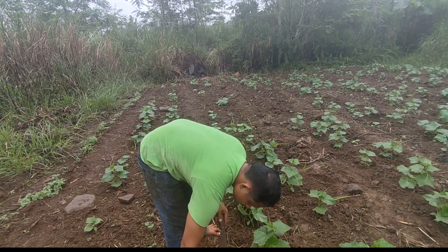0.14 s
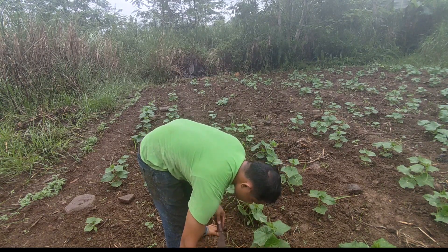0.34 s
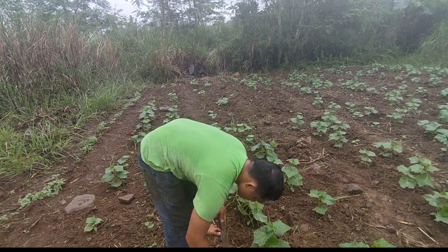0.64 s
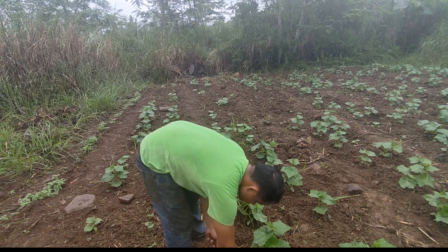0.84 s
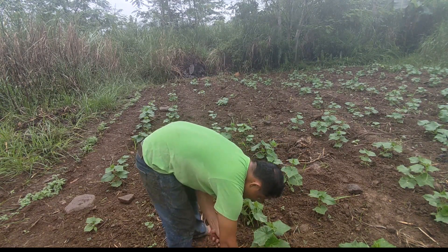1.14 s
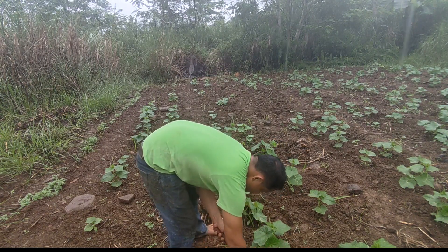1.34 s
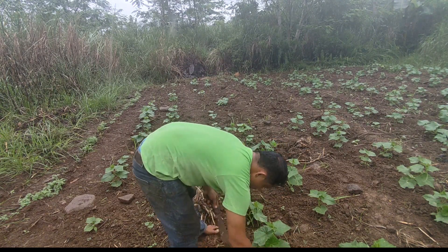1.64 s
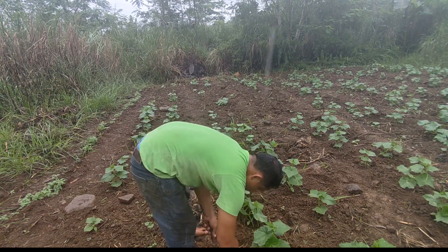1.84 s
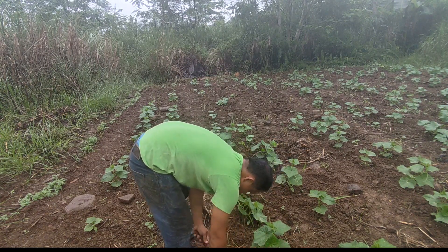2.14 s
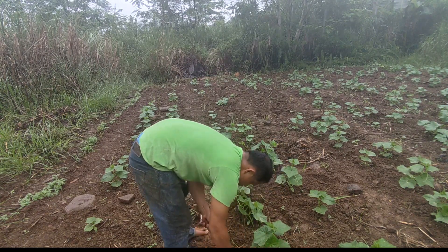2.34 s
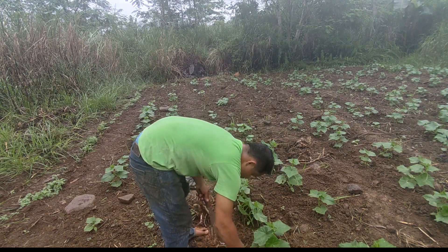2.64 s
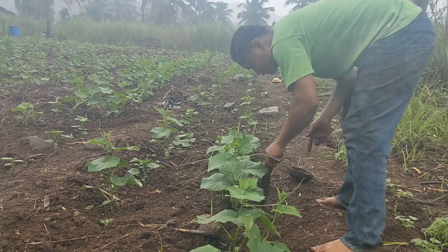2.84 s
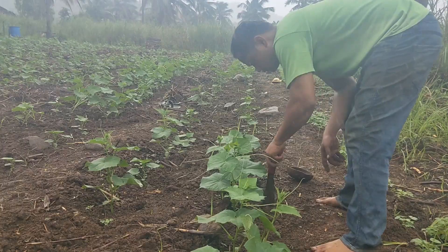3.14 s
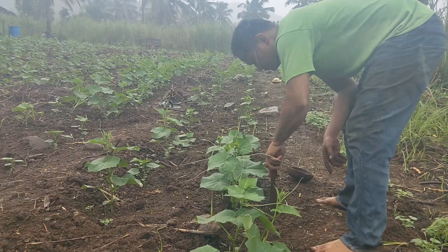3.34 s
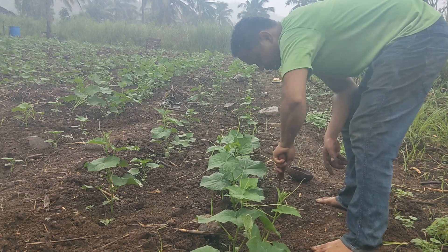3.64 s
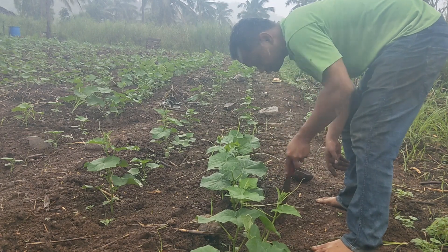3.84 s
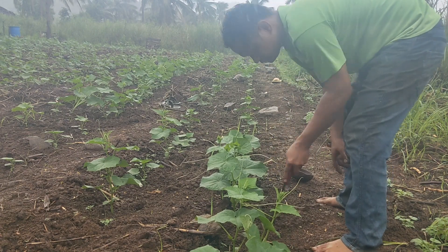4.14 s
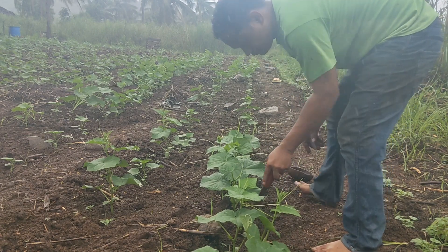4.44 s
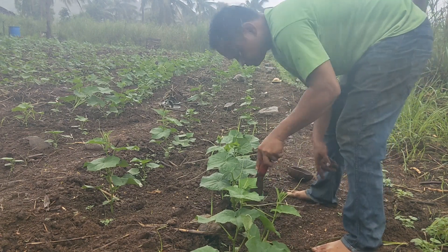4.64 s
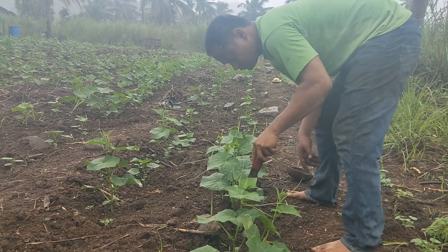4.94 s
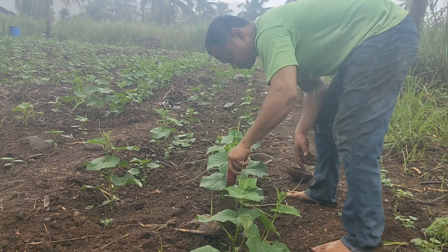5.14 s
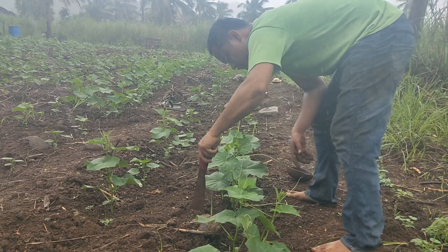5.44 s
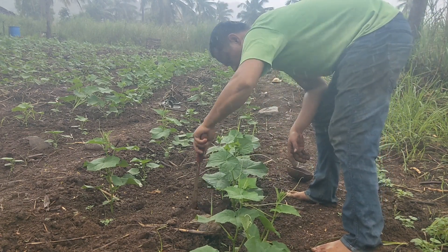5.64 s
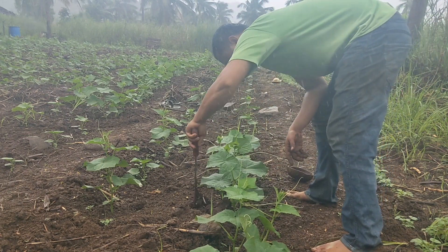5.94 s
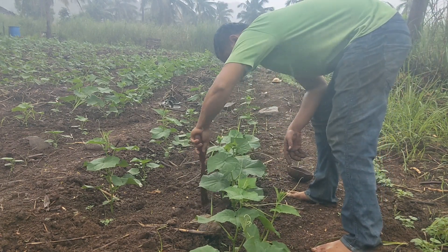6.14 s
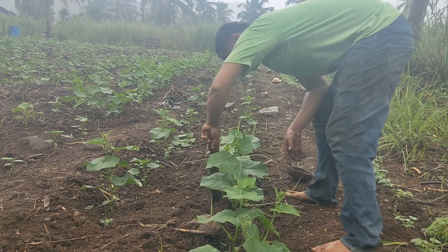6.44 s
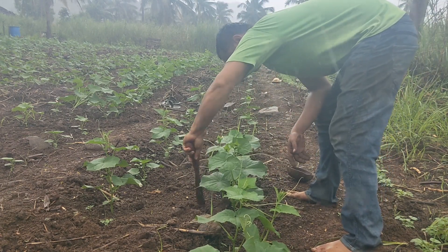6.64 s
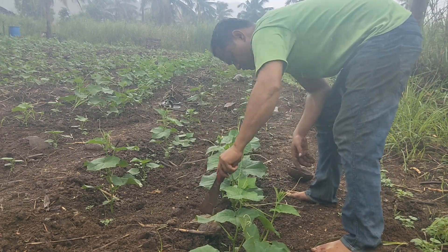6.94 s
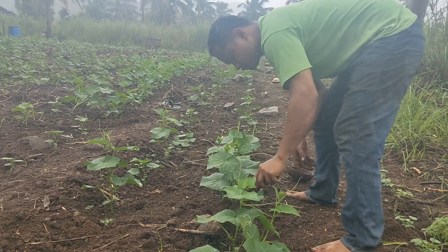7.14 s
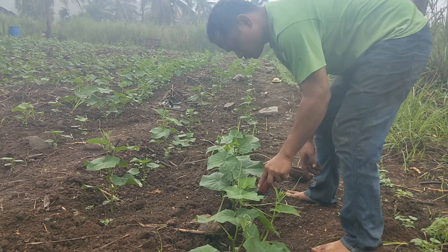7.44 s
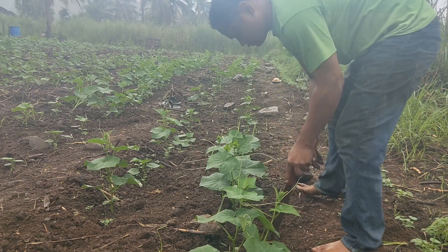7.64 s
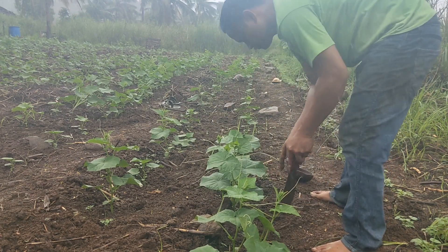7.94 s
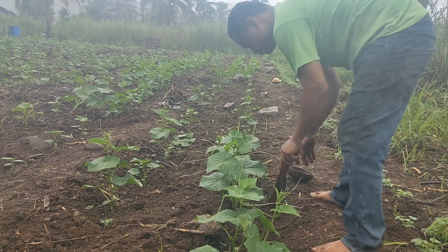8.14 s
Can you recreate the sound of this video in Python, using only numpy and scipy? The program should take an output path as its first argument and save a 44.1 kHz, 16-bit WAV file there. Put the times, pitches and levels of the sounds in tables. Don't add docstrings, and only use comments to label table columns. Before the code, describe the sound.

Raindrops thump dully and irregularly on a wet cover right at the microphones, with tiny splashes, over a soft steady hiss of rain on a field.

```python
import sys
import numpy as np
from scipy import signal
from scipy.io import wavfile
from scipy.ndimage import uniform_filter1d

SR = 44100
rng = np.random.default_rng(int(sys.argv[2]) if len(sys.argv) > 2 else 0)


def unload_audio(sound):
    columns = np.transpose(np.atleast_2d(sound))
    steps = np.round(np.clip(columns, -1, 1) * 32767)
    wavfile.write(sys.argv[1], SR, steps.astype(np.int16))


def elevation(decibels):
    levels = np.asarray(decibels, float)
    return 10 ** (levels / 20)


N = 365148


def evened(x):
    return x / np.sqrt(np.mean(x ** 2) + 1e-20)


def along(rows):
    return np.interp(np.arange(N) / SR, *np.transpose(rows))


def add(mix, start_s, sound):
    part = mix[round(start_s * SR):][:len(sound)]
    part += sound[:len(part)]


def band(x, lo_hz, hi_hz):
    return signal.sosfilt(signal.butter(2, [lo_hz, hi_hz], "bandpass", fs=SR, output="sos"), x)


def through_ports(x):
    # frequency in Hz, gain in dB.
    port_colours = [
        [(60, -7.5), (250, 2.5), (1200, .2), (2800, -4.5), (4600, -12.5), (6100, -16.5), (7500, -7.5), (9000, -5), (10800, 2), (12500, -11), (13400, -10), (16000, -34)],
        [(60, -6.5), (250, 5.5), (700, 1), (2500, 1), (4200, 0), (5200, -1), (6000, 0), (7000, -2.5), (8800, 2.5), (10500, -7.5), (12500, -14), (16000, -38)],
    ]
    grid_hz = abs(np.fft.fftfreq(4096, 1 / SR))
    out = []
    for channel, colour in zip(x, port_colours):
        hz, db = np.transpose(colour)
        log_gain = np.log(elevation(np.interp(np.log(grid_hz + 1), np.log(hz), db)))
        response = np.exp(np.conj(signal.hilbert(log_gain)))
        taps = np.fft.ifft(response).real[:1024]
        out.append(signal.oaconvolve(channel, taps / np.linalg.norm(taps))[:N])
    return np.array(out)


def every_drop():
    # start in seconds, thump pitch in Hz, thump peak in dB,
    # splash in dB, thump loss to the far microphone in dB.
    left_wet = [(0.3023, 555, -5, -28, -17), (0.3394, 1480, -17, -26, -16), (0.365, 870, -27, -28, -3),
                (0.4347, 580, -11, -28, -17), (0.6836, 1390, -9, -27, -12), (1.3766, 1360, -10, -16, -21),
                (1.7549, 1900, -9, -17, -25), (2.0932, 2040, -6, -23, -22), (2.1761, 1530, 0, -23, -30),
                (2.4362, 600, -16, -28, -20), (2.8083, 1670, -4, -13, -15), (2.9221, 1650, -22, -33, -10),
                (3.5165, 780, -13, -22, -24), (3.5232, 1940, -6, -11, -17), (4.3323, 600, -16, -23, -20),
                (4.5285, 790, 1, -21, -20), (5.3675, 1900, -10, -27, -11), (5.851, 520, -10, -19, -16),
                (6.0072, 1930, -5, -15, -18), (6.1002, 650, -6, -20, -17), (6.3107, 1160, -5, -15, -16),
                (6.7369, 2010, -9, -10, -13), (7.1007, 890, -23, -27, -18), (7.267, 1430, -7, -19, -21),
                (7.3483, 1710, -9, -25, -17), (7.7847, 685, -7, -20, -14), (7.9951, 2010, -4, -20, -19),
                (8.0223, 270, -26, -31, -16), (8.0411, 1920, -12, -21, -29), (8.1475, 530, -21, -11, -8)]
    right_heavy = [(0.2923, 360, -14, -35, -10), (0.8103, 408, -6, -12, -24), (0.9233, 433, -5, -25, -14),
                   (2.0028, 480, -26, -31, -17), (3.0411, 570, -5, -21, -23), (3.1123, 220, -16, -25, -10),
                   (3.216, 280, -24, -35, -19), (3.5899, 517, -10, -23, -18), (3.8066, 260, -4, -22, -12),
                   (4.785, 540, -16, -23, -32), (4.9115, 540, -9, -24, -18), (5.2789, 610, -18, -32, -12),
                   (6.0204, 660, -22, -29, -9), (6.0375, 330, -23, -34, -5), (6.1525, 310, -19, -20, -5),
                   (6.1724, 580, -24, -38, -27), (6.304, 330, -15, -19, -14), (6.3332, 600, -18, -34, -29),
                   (6.3825, 460, 1, -26, -21), (6.4182, 540, -24, -35, -24), (6.8177, 481, -8, -23, -31),
                   (6.9532, 224, -5, -15, -15), (7.2517, 444, -16, -22, -10), (7.3156, 484, -5, -30, -26),
                   (7.863, 345, -24, -30, -30), (8.0111, 284, -7, -18, -9), (8.1769, 540, -18, -32, -12)]
    right_light = [(0.3982, 1640, -12, -31, -25), (0.403, 1760, -16, -25, -32),
                   (1.8023, 1150, -1, -20, -22), (1.8348, 1660, -12, -27, -8), (2.5661, 1230, -4, -21, -15),
                   (2.9623, 1170, -21, -36, -10), (2.9794, 2030, -16, -31, -18),
                   (2.9918, 1150, -10, -21, -16), (3.1462, 1180, -20, -31, -19),
                   (3.2243, 2990, -10, -22, -13), (3.4486, 1150, -18, -29, -12),
                   (3.7312, 2810, -25, -30, -12), (4.0152, 1230, -27, -30, -22),
                   (4.568, 890, -20, -33, -26), (4.6451, 1960, -23, -28, -16),
                   (4.7613, 1020, -16, -29, -25), (5.0212, 1640, -16, -27, -12),
                   (5.0369, 1280, -12, -14, -14), (5.0578, 1210, 0, -24, -15),
                   (5.1275, 1150, -13, -27, -32), (5.4152, 1840, -12, -27, -11),
                   (5.8726, 2180, -10, -32, -5), (5.9852, 1040, -3, -33, -24),
                   (6.0543, 1230, -13, -15, -15), (6.1918, 1220, -18, -27, -25),
                   (6.5763, 1370, -13, -14, -13), (7.2338, 2200, -12, -24, -19),
                   (7.4402, 1130, -12, -21, -6), (8.1397, 1880, -5, -25, -10), (8.2481, 2030, -4, -25, -26)]
    # start in seconds,
    # thump pitch in Hz, thump peak in dB, thump loss to the far microphone in dB.
    left_dull = [(0.0037, 1100, -18, -15), (1.3592, 670, -21, -3), (2.4506, 1340, -21, -14),
                 (3.3648, 1420, -20, -4), (4.6551, 900, -21, -27), (4.6899, 750, -10, -18),
                 (4.733, 720, -12, -8), (5.2012, 1280, -21, -7), (5.3559, 550, -18, -15),
                 (5.3853, 730, -12, -17), (5.5885, 1090, -18, -10), (5.6229, 1150, -16, -29),
                 (5.683, 740, -13, -22), (5.9214, 1280, -13, -15), (6.1445, 1190, -10, -28),
                 (6.282, 1050, -18, -29), (6.4306, 1120, -6, -12), (6.5647, 1390, -20, -24),
                 (7.0776, 1390, -16, -16), (7.4795, 990, -11, -32), (7.5593, 620, -11, -25),
                 (7.5797, 580, -25, -12), (7.6013, 556, -9, -19), (7.9423, 1210, -19, -5),
                 (8.0843, 1130, -25, -22), (1.5762, 700, -26, -5), (7.6325, 2580, -26, -15),
                 (3.263, 1000, -24, -11), (4.632, 520, -33, -3), (7.367, 900, -27, -3)]
    right_dull = [(1.6567, 1290, -15, -5), (2.7933, 640, -14, -5), (3.1949, 400, -20, -30),
                  (3.2817, 250, -18, -29), (3.5378, 1250, -11, -17), (3.6922, 1360, -21, -10),
                  (3.8418, 450, -25, -15), (3.8783, 1170, -24, -20), (3.9719, 1080, -24, -23),
                  (4.118, 660, -26, -3), (4.4428, 490, -21, -26), (5.1777, 2650, -24, -12),
                  (5.2947, 1400, -12, -23), (5.4587, 1120, -19, -29), (5.6569, 920, -19, -11),
                  (6.4445, 1090, -11, -24), (6.6809, 484, -25, -19), (6.7469, 1080, -22, -14),
                  (6.7641, 1130, -18, -29), (6.8411, 260, -17, -20), (7.1273, 440, -13, -30),
                  (7.6929, 500, -7, -23), (8.1322, 1370, -17, -27), (1.4952, 360, -25, -7),
                  (7.5041, 300, -27, -3), (2.045, 380, -30, -24), (2.108, 620, -26, -30),
                  (3.158, 300, -29, -3), (4.595, 560, -33, -10), (7.173, 450, -28, -11)]
    # start in seconds, thump
    # pitch in Hz, thump peak in dB, splash left in dB, splash right in dB.
    middle_drops = [(.3223, 530, -21, -37, -34), (.4651, 590, -13, -32, -26), (1.006, 353, -17, -26, -26.5),
                    (1.2321, 327, -12, -35, -28), (1.9632, 370, -5, -34, -28), (2.1445, 256, -11, -37, -23),
                    (3.025, 350, -13, -35, -29), (3.3308, 303, -6, -33, -15.5),
                    (3.8315, 560, -15, -50, -44), (4.4532, 450, -20, -31, -32),
                    (6.7969, 440, -21, -44, -27), (7.2972, 670, -21, -48, -44),
                    (7.5671, 470, -25, -29, -38), (7.7623, 710, -21, -56, -38),
                    (8.1062, 640, -24, -31, -31),
                    (.7249, 1340, -23, -49, -51), (1.4621, 1050, -14, -15, -29),
                    (1.5095, 720, -26, -37, -30), (1.5564, 1330, -21, -35, -42),
                    (1.7252, 970, -13, -15, -12.5), (1.949, 2370, -17, -15, -21),
                    (2.3062, 1260, -9, -36, -26), (3.6725, 1150, -20, -29, -27),
                    (4.7238, 1880, -5, -15, -16), (7.1141, 1150, -20, -38, -39),
                    (7.4526, 2040, -6, -14, -18.5), (7.5392, 2590, -21, -29, -29),
                    (7.8291, 1390, -21, -40, -45), (7.8365, 1100, -12, -30, -39),
                    (7.8849, 1190, -10, -14, -18.5), (7.9365, 1250, -12, -23, -14),
                    (3.4043, 1280, -29, -43, -33), (3.6046, 1140, -30, -58, -32),
                    (6.6508, 2250, -25, -36, -30), (7.1064, 1360, -20, -42, -38)]
    # start in seconds, thump pitch in Hz, thump peak in
    # dB.
    left_small = [(0.0342, 560, -33), (0.4149, 1920, -34), (0.6039, 560, -35), (0.786, 3290, -34),
                  (0.9047, 1140, -31), (0.9871, 1440, -26), (1.0579, 520, -34), (1.4006, 410, -35),
                  (1.4864, 1160, -28), (1.6336, 1380, -27), (1.6815, 750, -33), (1.9289, 600, -34),
                  (2.3899, 780, -32), (2.6049, 580, -36), (2.6173, 1210, -31), (2.8673, 710, -31),
                  (3.4829, 560, -34), (3.6046, 1140, -26), (3.6844, 1100, -37), (4.1289, 750, -28),
                  (4.3978, 500, -35), (5.8685, 1870, -20), (5.9303, 620, -33), (5.9413, 1870, -30),
                  (5.9672, 1120, -31), (6.063, 730, -32), (6.2007, 600, -26), (6.295, 1250, -27),
                  (6.5334, 1180, -31), (6.5873, 1360, -28), (6.7744, 2630, -27), (6.8697, 620, -28),
                  (7.1476, 710, -33), (7.7292, 1180, -34), (7.9033, 2260, -33), (7.9687, 1490, -28),
                  (8.047, 1440, -23), (8.0759, 1160, -31), (8.1233, 690, -28), (8.1997, 430, -36),
                  (8.2396, 670, -35), (8.2635, 560, -34)]
    right_small = [(0.0332, 340, -30), (0.7017, 340, -26), (0.8613, 520, -35), (0.9871, 520, -35),
                   (1.2829, 300, -31), (1.3926, 390, -26), (1.3996, 320, -23), (1.4136, 540, -33),
                   (1.6336, 340, -31), (2.2502, 340, -31), (2.3604, 390, -34), (2.3904, 520, -35),
                   (2.4807, 1340, -30), (2.5221, 710, -33), (2.5979, 340, -30), (2.7426, 340, -26),
                   (2.8698, 410, -36), (3.4824, 340, -29), (3.5288, 340, -23), (3.66, 340, -33),
                   (3.8934, 1940, -25), (4.1289, 780, -28), (4.3439, 390, -35), (4.3948, 320, -32),
                   (4.8154, 1310, -29), (4.8223, 1270, -30), (4.8752, 1100, -28), (4.8832, 2240, -30),
                   (5.1496, 410, -34), (5.7792, 620, -30), (5.8096, 470, -26), (6.1822, 750, -35),
                   (6.3539, 320, -28), (6.505, 470, -31), (6.5389, 260, -29), (7.0178, 320, -30),
                   (7.3596, 340, -30), (7.4259, 520, -31), (7.4708, 1400, -26), (7.5297, 410, -25),
                   (7.7287, 520, -34), (7.7422, 300, -27), (7.7751, 730, -33), (7.7951, 840, -27),
                   (7.8081, 1420, -29), (8.2002, 370, -28), (8.2635, 300, -27)]

    left = [(row, -11) for row in left_wet]
    left += [((s, hz, hit, -41, loss), -2.5) for s, hz, hit, loss in left_dull]
    right = [(row, -17) for row in right_heavy]
    right += [(row, -13) for row in right_light]
    right += [((s, hz, hit, -38, loss), -14) for s, hz, hit, loss in right_dull]

    rows = [(s, hz, hit, hit + loss, wet, wet + wet_loss) for (s, hz, hit, wet, loss), wet_loss in left]
    rows += [(s, hz, hit + loss, hit, wet + wet_loss, wet) for (s, hz, hit, wet, loss), wet_loss in right]
    rows += [(s, hz, hit - 2.2, hit, *wet) for s, hz, hit, *wet in middle_drops]
    far_db, wet_db = -18, -14
    rows += [(s, hz, hit, hit + far_db, hit + wet_db, -70) for s, hz, hit in left_small]
    rows += [(s, hz, hit + far_db, hit, -70, hit + wet_db) for s, hz, hit in right_small]
    return rows


def thump(hz, chance, knock=.6, knock_hz=1250, rebound=.45, body=.1, heavy_body=.42):
    t = np.arange(800) / SR
    u = t * hz
    heavy = hz < 400
    if heavy:
        settle, sink, cycles = .58, 1.05, .8
    else:
        settle, sink, cycles = .86, .5, 1.05 if hz < 1000 else .82
    turns = settle * u + sink * (.65 + .5 * chance[0]) * .55 * (1 - np.exp(-u / .7))
    decay = np.exp(-u / (cycles * (.8 + .4 * chance[1])))
    swing = np.sin(2 * np.pi * turns) * decay * (1 - np.exp(-u / .16))
    hard = knock if heavy else .3 * chance[2] ** 2
    swing += hard * np.sin(2 * np.pi * knock_hz * (.8 + .35 * chance[3]) * t) * np.exp(-t / .0013)
    answer_hz = 480 + 160 * chance[6] if heavy else 200 + 200 * chance[6]
    answer = heavy_body if heavy else body
    swing += answer * np.sin(2 * np.pi * answer_hz * t) * np.exp(-t / .0035)
    second_t = 1.25 * (t - .0015 - .004 * chance[5])
    swing += rebound * chance[4] ** 2 * np.interp(second_t, t, swing, 0, 0)
    swing = signal.lfilter([1, -1], [1, -np.exp(-2 * np.pi * .16 * hz / SR)], swing)
    return swing / abs(swing).max()


def splash(noise, chance, quick_s=.0003, slow_s=.002, spray=.05, lead_s=.0016, lead=.17):
    t = (np.arange(len(noise)) - 300) / SR
    after = np.exp(-abs(t) / (quick_s * (.5 + 1.5 * chance))) + spray * np.exp(-abs(t) / slow_s)
    before = np.exp(-abs(t) / .00018) + lead * np.exp(-abs(t) / lead_s)
    burst = noise * np.where(t > 0, after, before)
    return burst / np.sqrt(np.sum(burst ** 2) / 140)


def near_drops(ragged=.24, ragged_s=.0045):
    thumps, splashes, breakup = np.zeros((3, 2, N + 300))
    drops = every_drop()
    chances = rng.random((len(drops), 2, 12))
    noises = rng.standard_normal((len(drops), 2, 900))
    for (s, hz, *db), pair, hiss in zip(drops, chances, noises):
        heavy = hz < 400
        for side in (0, 1):
            chance = pair[side]
            far = db[side] < db[1 - side]
            heard_s = s + far * (.0006 * chance[7] + .21 / hz)
            detune = 1 + far * .5 * (chance[8] - .4)
            sign = 1 if heavy or chance[9] < (.5 if far else .8) else -1
            thump_gain = sign * elevation(db[side] + (1.2 if heavy else -.7))
            add(thumps[side], heard_s, thump_gain * thump(hz * detune, chance))
            add(splashes[side], heard_s, elevation(db[2 + side] + .3) * splash(hiss[side], chance[10]))
            fade = np.exp(-np.arange(900) / SR / (ragged_s * (.4 + chance[11])))
            rattle = hiss[side, ::-1] ** 3 / 4 * fade
            add(breakup[side], heard_s, ragged * elevation(db[side]) * rattle)
    wet_cover = band(thumps, 85, 6000) + band(breakup, 300, 2100)
    spray = band(band(splashes[:, 300:], 1800, 21000), 2610, 21000)
    return wet_cover[:, :N] + through_ports(spray)


def hum_of_cover(x, hz=265, width_hz=36, ring_level=.18):
    r = np.exp(-np.pi * width_hz / SR)
    poles = [1, -2 * r * np.cos(2 * np.pi * hz / SR), r * r]
    return x + ring_level * signal.lfilter([1 - r, 0, r - 1], poles, x)


def shatters(per_s=1800, hz=1600, width_hz=900, bright=.35):
    # start in seconds, length in seconds, level left in dB, level right in dB.
    shattered_drops = [
        (.399, .011, -40, -19),
        (.4325, .004, -20, -34),
        (.8175, .004, -23, -40),
        (1.945, .005, -26, -26),
        (2.1775, .007, -11, -36),
        (4.7245, .004, -14, -14),
        (7.4535, .006, -20, -22),
        (7.938, .009, -26, -24),
    ]
    out = np.zeros((2, N))
    t = np.arange(200) / SR
    ring = np.sin(2 * np.pi * hz * t) * np.exp(-np.pi * width_hz * t)
    ring += bright * np.sin(2 * np.pi * 2.1 * hz * t) * np.exp(-np.pi * 1.5 * width_hz * t)
    chances = rng.random((len(shattered_drops), 2, 2, 700))
    for (s, length_s, *db), (size, when) in zip(shattered_drops, chances):
        u = np.arange(700) / SR / length_s
        fade = np.exp(-u ** 2) * (u < 1.3)
        for side in (0, 1):
            droplets = (2 * size[side] - 1) * (when[side] < per_s / SR) * fade
            rattle = np.convolve(droplets, ring) + .5 * np.pad(droplets, (0, 199))
            add(out[side], s, elevation(db[side]) * rattle / (abs(rattle).max() + 1e-9))
    return out


def patter(per_s=66, level_db=-45, spread_db=3.8):
    out = np.zeros((2, N))
    taps = [thump(240 * 7.5 ** chance[9] ** 2.2, chance)[:500] for chance in rng.random((120, 12))]
    count = int(2 * per_s * N / SR)
    for kind, size, sign, side, when in rng.random((1600, 5))[:count]:
        db = level_db - spread_db * np.log(.06 + size)
        tap = taps[int(kind * len(taps))]
        add(out[int(side < .55)], when * N / SR, elevation(db) * np.sign(sign - .4) * tap)
    return band(out, 150, 9000)


def far_rain(patchy_db=2.2, grains_per_s=2500, grainy=.45):
    # time in seconds, level in dB.
    rain_strength = [
        (0.0, -49.5),
        (6.94, -50.5),
        (7.93, -49),
        (8.28, -50.5),
    ]
    grains = elevation(3.53 * rng.exponential(1, (2, N))) * (rng.random((2, N)) < grains_per_s / SR)
    grains *= rng.choice([-1., 1.], (2, N))
    hiss = rng.standard_normal((2, N)) + grainy * evened(grains)
    _, _, z = signal.stft(hiss, nperseg=256)
    drift = uniform_filter1d(rng.standard_normal(z.shape), 6, 1)
    patches = evened(uniform_filter1d(drift, 14, 2))
    wash = signal.istft(z * elevation(patchy_db * patches), nperseg=256)[1][:, :N]
    side_gain = elevation([[3.0], [6.0]])
    return elevation(along(rain_strength)) * evened(through_ports(wash)) * side_gain


def rumble(shared=.7):
    # time in seconds, level in dB.
    air_strength = [
        (0, -49),
        (2.4, -49.5),
        (2.8, -54),
        (8.28, -53),
    ]
    left, right, both = rng.standard_normal((3, N))
    air = band(np.array([left, right]) + shared * both, 30, 56)
    return elevation(along(air_strength) - 2.5) * evened(air)


def scene():
    return hum_of_cover(near_drops()) + shatters() + patter() + far_rain() + rumble()


def starved(x, limit_db=-87.5, top_hz=13900, busy=1.05, sudden=3.7):
    hz, t, z = signal.stft(x, SR, nperseg=256, noverlap=128)
    now = uniform_filter1d(abs(z) ** 2, 2, 1)
    lasting = uniform_filter1d(now, 12, 2)
    recent = uniform_filter1d(now.sum((0, 1)), 7, origin=3)
    loud_db = 10 * np.log10(recent + 1e-12)
    edge_hz = top_hz + 450 * np.repeat(rng.uniform(-1, 1, len(t)), 16)[:len(t)]
    over_db = busy * np.clip(loud_db + 42, 0, 14) + 9 * (hz[:, None] > edge_hz)
    limit = elevation(limit_db + 3 + over_db) ** 2
    strength = np.minimum(lasting, 2.2 * uniform_filter1d(now, 5, 1))
    weak = (strength < limit) & (hz[:, None] > 3000)
    weak &= uniform_filter1d(now / (lasting + 1e-20), 12, 1) < sudden
    return signal.istft(z * ~weak, SR, nperseg=256, noverlap=128)[1][:, :N]


def roll_off(x):
    return signal.sosfilt(signal.butter(12, 16650, fs=SR, output="sos"), x)


def record(dry):
    # start and end of the silence, both in seconds.
    silence_s = (2.7635, 2.772)
    t = np.arange(N) / SR
    outside_s = np.maximum(silence_s[0] - t, t - silence_s[1])
    sounding = np.clip(outside_s / .002, .03, 1)
    overloaded = 1.314 * np.tanh(dry / 1.283)
    return roll_off(starved(overloaded) * sounding)


dry = scene()
out = record(dry)
unload_audio(out)
```